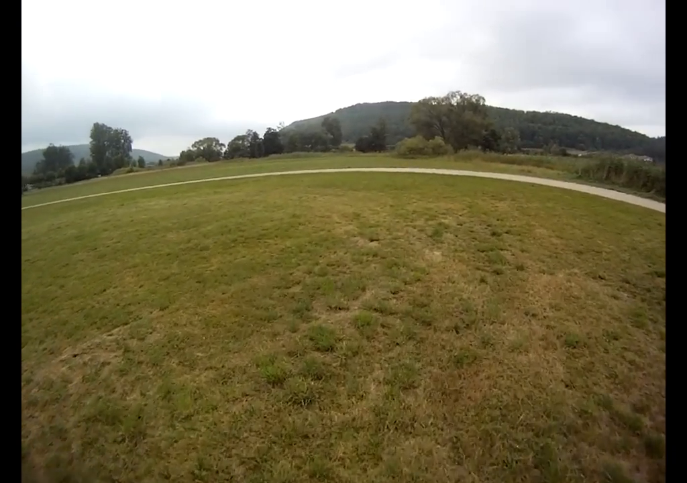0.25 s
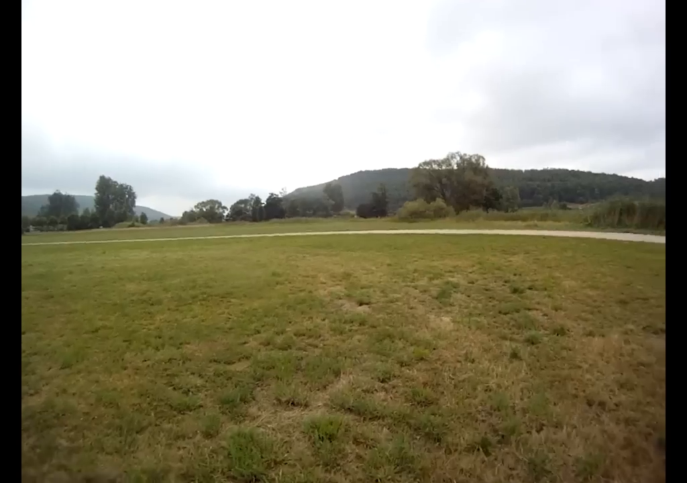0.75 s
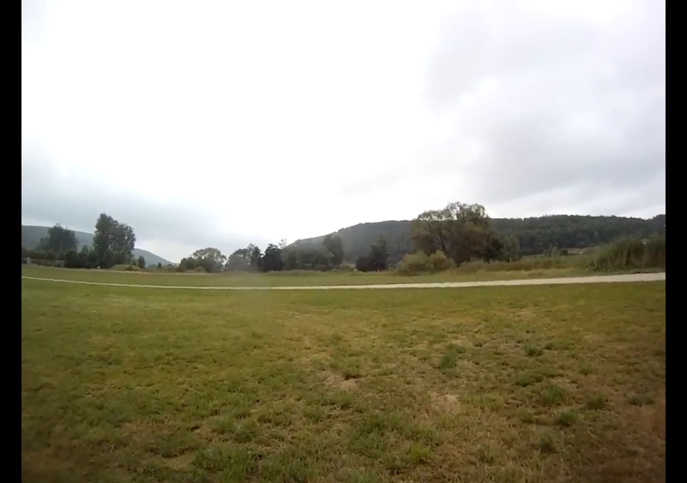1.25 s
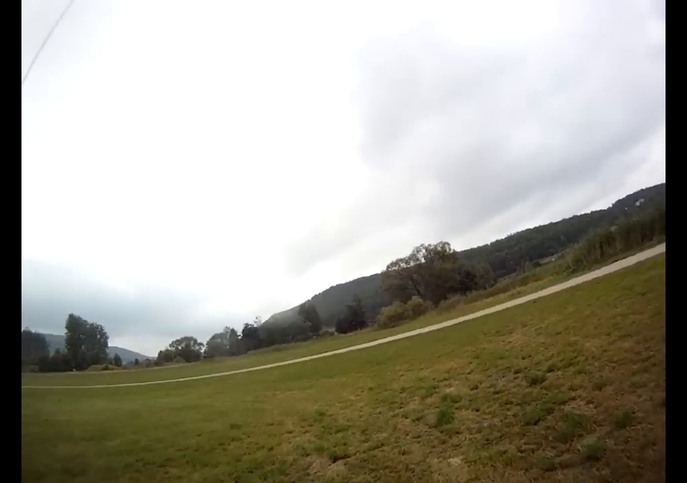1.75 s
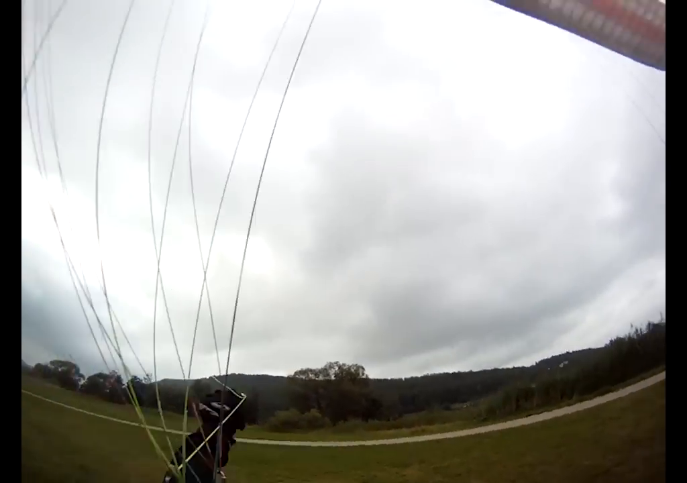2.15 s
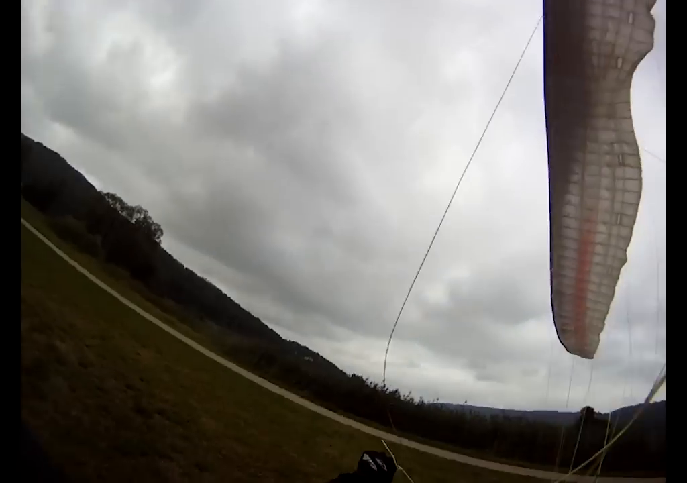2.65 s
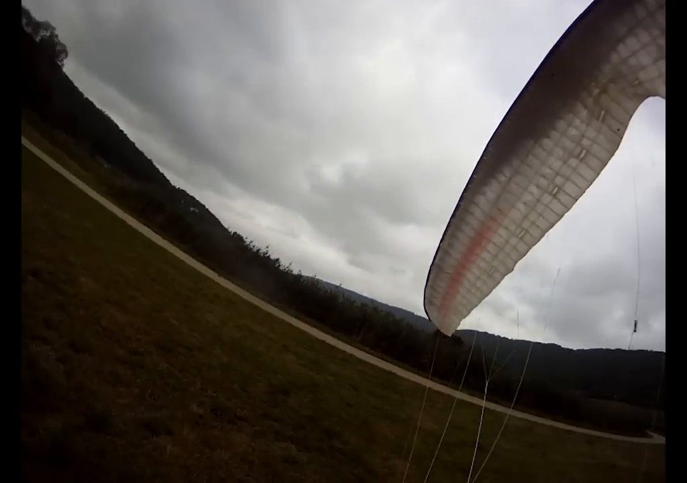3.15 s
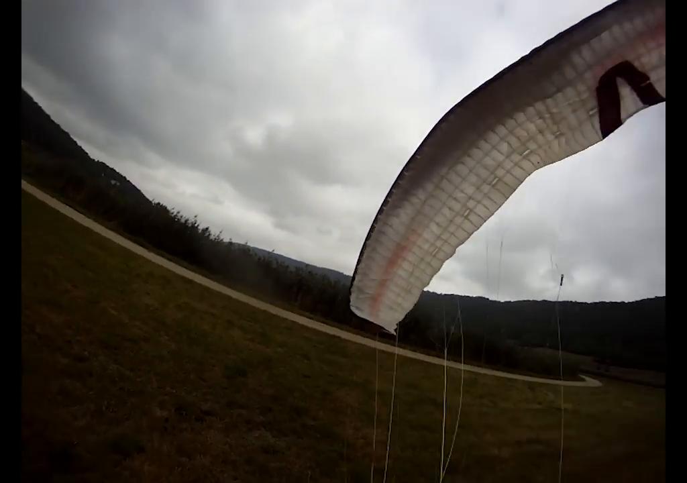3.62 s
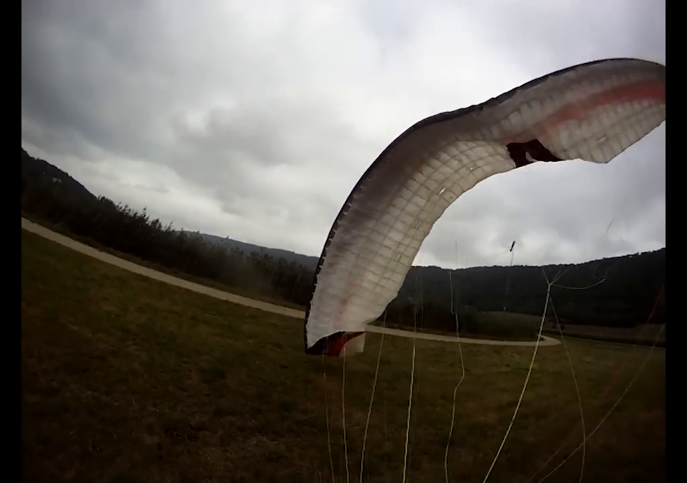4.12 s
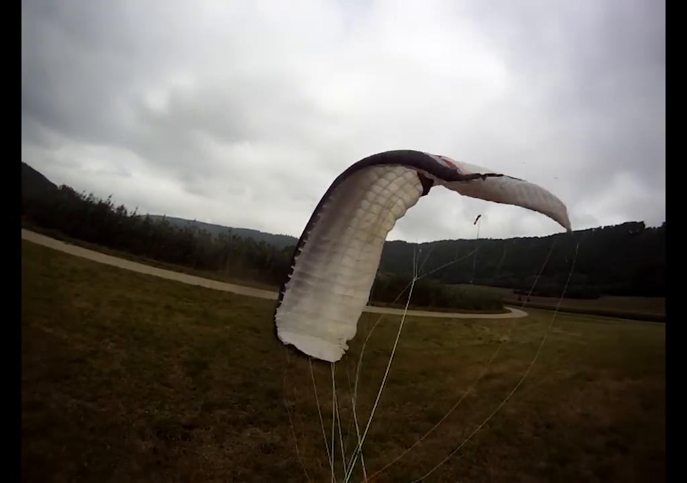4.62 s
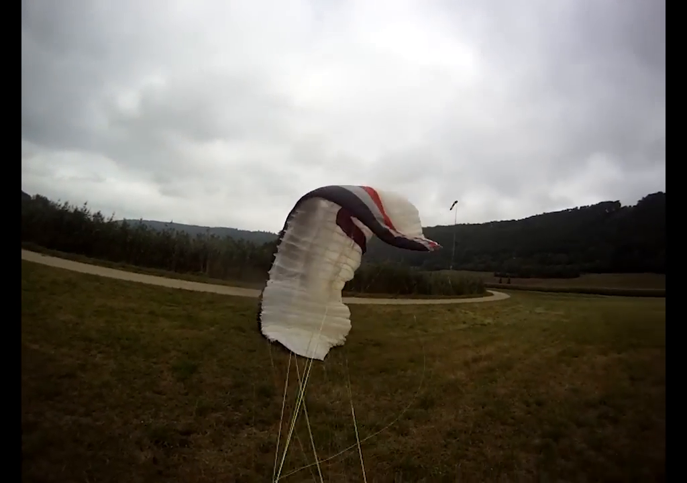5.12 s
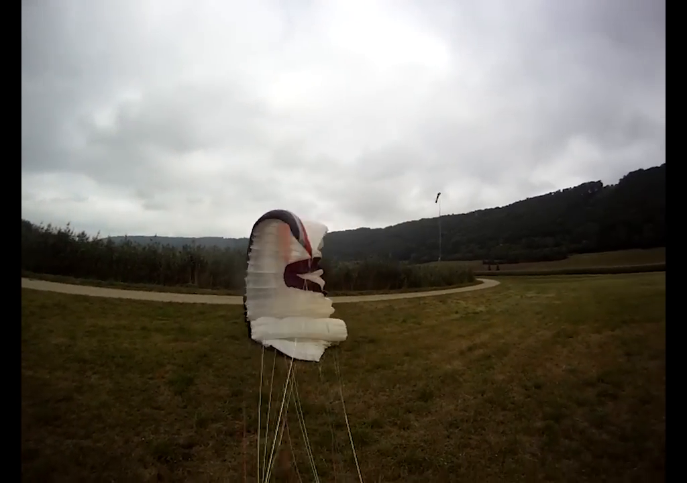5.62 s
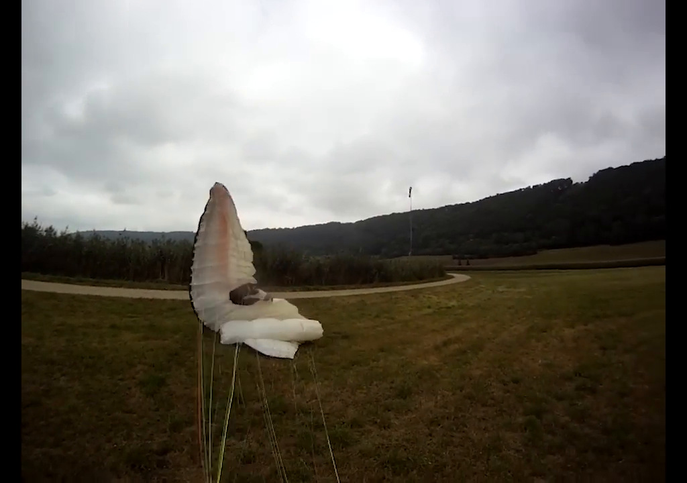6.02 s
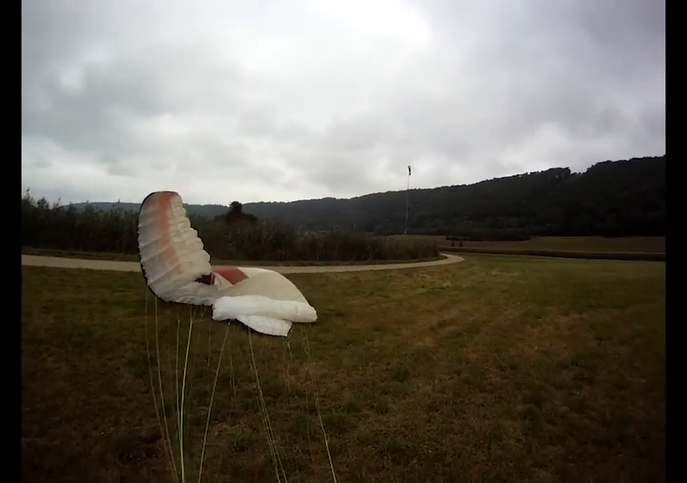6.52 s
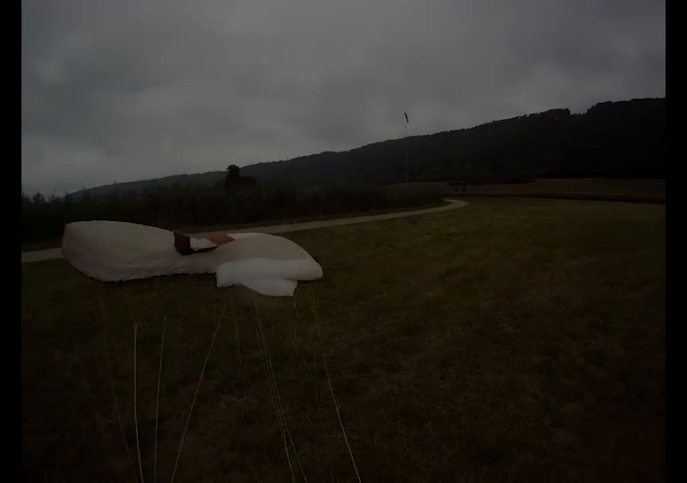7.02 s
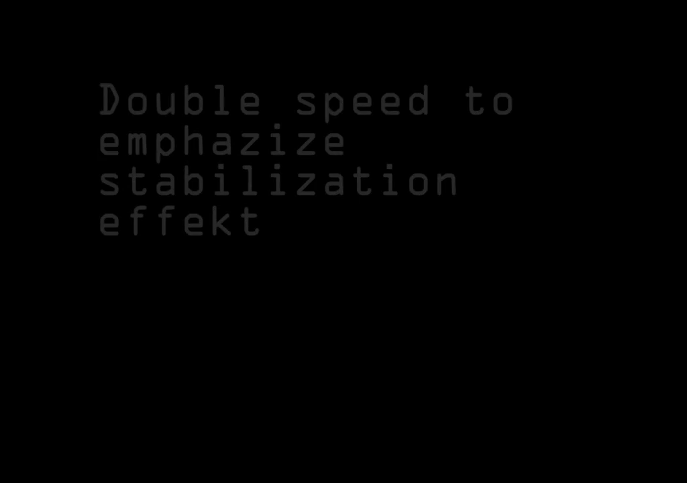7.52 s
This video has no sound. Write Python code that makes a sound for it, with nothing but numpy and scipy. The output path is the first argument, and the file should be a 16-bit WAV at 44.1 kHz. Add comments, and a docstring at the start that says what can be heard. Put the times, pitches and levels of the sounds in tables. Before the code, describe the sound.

Outdoors on open grass, heard dry and very close through a slightly gritty body-worn microphone. From 0 to 0.6 seconds low wind buffets it, with brief rough squeaks of thin lines around 0.3. At 0.6 to 0.72 a dense cluster of hard plastic knocks rattles loudly while the wind falls away; cloth puffs, strap rubs and weaker knocks follow until 1.55. Ribbed webbing then zips over an edge: the first pull, 1.55 to 2.63, climbs quickly to a bright buzzing whine near 2.2 and drops; the second, 2.75 to 4.2, is slower, lower, uneven and scratchy. From 4.2 the canopy flutters and rustles with papery crackles, with sharper snaps around 4.8 and 5.05, calming after 5.4. Faint breeze, hiss and soft cloth remain. Grainy strap scrapes come at 6.55 to 7.3, strongest near 7.1, then silence from 7.47.

```python
"""A paraglider pilot lands on a meadow, heard from a camera worn on the body.
First coloured noise buffets the microphone while thin lines squeak as gliding sines; then the wind dies away
as the gear knocks on the camera in noise cracks and ringing modes. Ribbed webbing zips over an edge in two long
pulls, a tick for each rib, while the pilot turns round. Last the canopy flutters in lumpy noise, crackles
with crease clicks and sinks onto the grass, and the straps slide once more in a grainy scrape."""
import sys
import numpy as np
from scipy import signal
from scipy.fft import rfft, irfft, next_fast_len
from scipy.io import wavfile
from scipy.ndimage import uniform_filter1d, map_coordinates

SR = 44100
rng = np.random.default_rng(int(sys.argv[2]) if len(sys.argv) > 2 else 0)


def generate_wav(signal):
    """Clip the signal to [-1, 1] and save it as 16-bit WAV at the path in sys.argv[1]."""
    frames = np.transpose(np.atleast_2d(signal))
    scaled = np.clip(frames, -1, 1) * 32767
    pcm = np.round(scaled).astype(np.int16)
    wavfile.write(sys.argv[1], SR, pcm)


N = 342416
T = np.arange(N) / SR  # time axis in seconds


def amp(db):
    """Decibels to gain."""
    return 10 ** (np.asarray(db) / 20)


def unit(x):
    """Scale to rms 1."""
    return x / np.sqrt(np.mean(x ** 2) + 1e-20)


def curve(rows):
    """Join (time_s, value) rows with straight lines, one value per sample."""
    return np.interp(T, *np.transpose(rows))


def swell(rows):
    """Gain of a (time_s, level_db) curve that fades out steeply beyond its ends."""
    outside_s = np.abs(T - np.clip(T, rows[0][0], rows[-1][0]))
    return amp(curve(rows) - 600 * outside_s)


def stroke(start_s, length_s, edge_s):
    """Gain that rises, holds for length_s and dies away, with time constant edge_s at both ends."""
    outside_s = np.abs(T - np.clip(T, start_s, start_s + length_s))
    return np.exp(-outside_s / edge_s)


def wobble(rate):
    """A smooth random curve with rate knots a second."""
    knots = rng.standard_normal(int(N * rate / SR) + 4)
    return map_coordinates(knots, [T * rate])


def coloured(x, spectrum):
    """Causal, minimum-phase filter of unit energy with the given (freq_hz, level_db) outline."""
    size = 4096
    hz, db = np.transpose(spectrum)
    level_db = np.interp(np.log(np.fft.rfftfreq(size, 1 / SR) + 1), np.log(hz + 1), db)
    cepstrum = irfft(np.log(amp(level_db) + 1e-6))
    # folding the cepstrum onto its first half makes the filter causal
    folded = 2 * cepstrum * (np.arange(size) < size // 2)
    kernel = irfft(np.exp(rfft(folded)))
    return signal.fftconvolve(x, kernel / np.linalg.norm(kernel))[:len(x)]


def noise(spectrum):
    """Coloured noise of rms 1."""
    return unit(coloured(rng.standard_normal(N), spectrum))


def pulses(at, sizes):
    """Sharp pulses at fractional sample positions, each a windowed sinc."""
    taps = np.floor(at).astype(int)[:, None] + np.arange(-7, 9)
    offset = taps - at[:, None]
    shape = np.sinc(offset) * np.cos(np.pi * offset / 16) ** 2
    return np.bincount(np.clip(taps, 0, N - 1).ravel(), (shape * sizes[:, None]).ravel(), N)


def bursts(rows, t60):
    """A dying puff of noise for each (time_s, level_db) row; it falls by 60 dB in t60 seconds."""
    t = np.arange(SR // 4) / SR
    envelope = np.zeros(N + SR)
    for time_s, level_db in rows:
        envelope[round(time_s * SR):][:len(t)] += amp(level_db - 60 * t / t60)
    return envelope[:N] * rng.standard_normal(N)


def patchy(x, depth_db):
    """Let the gain drift separately in patches about 500 Hz wide and 20 ms long."""
    z = signal.stft(x, nperseg=256)[2]
    across_pitch = uniform_filter1d(rng.standard_normal(z.shape), size=3, axis=0)
    field = uniform_filter1d(across_pitch, size=7, axis=1)
    gain = unit(amp(depth_db * unit(field)))
    return signal.istft(z * gain, nperseg=256)[1][:N]


# swells of air in harness and canopy: start_s, length_s, flutter_db, push_db (push on the microphone)
BILLOWS = [(0.122, .04, -57, -32), (0.787, 0.019, -26.5, -28), (1.31, 0.013, -39, -50),
           (1.432, 0.059, -38.5, -50), (1.54, .02, -38.5, -54), (2.406, 0.294, -50.5, -46.5),
           (4.888, 0.013, -35.5, -35.5), (5.07, 0.027, -46, -36.5), (6.03, 0.082, -52, -42.5),
           (7.12, .2, -48, -59)]


def billow_gains():
    """Each swell of air both flutters the cloth and pushes on the microphone; returns the two gains."""
    flutter, push = np.zeros(N), np.zeros(N)
    for start_s, length_s, flutter_db, push_db in BILLOWS:
        shape = stroke(start_s, length_s, edge_s=.018)
        flutter += amp(flutter_db) * shape
        push += amp(push_db) * shape
    return flutter, push


# bright, papery colour of creasing cloth: freq_hz, level_db (relative)
CREASE_COLOUR = [(350, -15.5), (600, 1), (807, -6.5), (971, -6), (1800, -8), (2160, -4.5), (3020, -3),
                 (3630, -13.5), (4890, -11), (5600, -22), (7000, -54)]


def creased(x):
    """Give a signal the bright, papery colour of creasing cloth."""
    return coloured(x, CREASE_COLOUR)


TOUCHDOWN_S, SLOWING_DB_PER_S = 0.58, 26  # the airflow fades once the feet are down
FLIGHT_DB, DRAUGHT_DB, HISS_DB = -29.5, -45, -52.5  # buffeting in flight; breeze on the ground; faint hiss
# colour of the buffeting in flight: freq_hz, level_db (relative)
BUFFET_COLOUR = [(10, -12), (20, 3.5), (37, 4.5), (55, 7), (75, 4.5), (110, -4.5), (170, -10), (300, -22),
                 (600, -60)]
# colour of the low breeze and of the pushes from the cloth: freq_hz, level_db (relative)
DRAUGHT_COLOUR = [(10, -23.5), (20, 4.5), (42, -2.5), (62, 1.5), (92, 1.5), (125, -5), (200, -16),
                  (450, -49.5)]


def wind():
    """Flight speed buffets the microphone; a low draught, pushes from the cloth and a faint hiss remain."""
    airflow = amp(FLIGHT_DB - SLOWING_DB_PER_S * np.maximum(T - TOUCHDOWN_S, 0))
    eddies = unit(noise(BUFFET_COLOUR) * amp(1.2 * wobble(18)))
    _, pushes = billow_gains()
    draught = np.hypot(amp(DRAUGHT_DB + 2.2 * wobble(6)), pushes)
    hiss = unit(creased(rng.standard_normal(N)))
    return airflow * eddies + draught * noise(DRAUGHT_COLOUR) + amp(HISS_DB) * hiss


# dull colour of webbing dragged without a tone: freq_hz, level_db (relative)
SCRAPE_COLOUR = [(400, -23), (700, -8), (1150, -6), (1700, -11), (1930, -4.5), (2130, 2), (2400, -6),
                 (3100, -4), (3900, -15), (5200, -20.5), (7000, -58.5)]


def dull_scrape():
    """Steady friction noise of sliding straps."""
    return noise(SCRAPE_COLOUR)


# straps and clothes rubbing: start_s, length_s, level_db
RUBS = [(0.354, 1.36, -50), (0.714, .035, -38), (.76, 0.124, -46.5), (0.988, 0.0098, -49),
        (1.039, 0.048, -42), (1.238, 0.1, -46), (5.918, 0.047, -48.5), (6.557, 0.046, -37),
        (6.689, 0.066, -41.5), (6.771, 0.295, -40), (7.085, 0.061, -33.5), (7.156, 0.029, -40.5),
        (7.216, 0.076, -40.5), (7.31, 0.3, -54)]
# thin lines squeaking in their guides: time_s, pitch_hz (about which it wavers), level_db (relative)
SQUEAKS = [(0.255, 2770, -49.5), (0.288, 2850, -43.5), (0.326, 2630, -52), (0.356, 2820, -60),
           (0.424, 2150, -56)]


def harness():
    """Straps rub against the clothes in a fine, grainy scrape; taut lines give brief, rough squeaks."""
    scrape = unit(dull_scrape() * amp(1.8 * wobble(60) + 1.2 * wobble(400)))
    rub_power = sum((amp(level_db) * stroke(start_s, length_s, edge_s=.007)) ** 2
                    for start_s, length_s, level_db in RUBS)
    squeaks = np.zeros(N)
    for time_s, pitch_hz, level_db in SQUEAKS:
        slip = np.exp(-.5 * ((T - time_s) / 0.0075) ** 2)
        # the pitch arches with the slip and jitters fast, which makes the squeak rough
        glide_hz = pitch_hz * (.9 + .1 * slip + .09 * wobble(1800))
        tone = np.sin(2 * np.pi * np.cumsum(glide_hz) / SR)
        squeaks += amp(level_db) * slip * (tone + amp(-19) * scrape)
    return np.sqrt(rub_power) * scrape + amp(4.0) * squeaks


SUIT_DB, SUIT_REST_DB, STANDING_S = -44, -50.5, 1.49  # clothes flutter until the pilot stands
# body of the billowing cloth: freq_hz, level_db (relative)
BILLOW_COLOUR = [(60, -29), (120, -1.5), (190, -1), (320, -1), (540, -2.5), (760, -15.5), (1100, -32.5),
                 (1600, -38), (3000, -68.5)]
# cloth snapping taut: time_s, level_db (relative)
SNAPS = [(0.8816, -22), (0.9935, -25), (4.4169, -36), (4.7396, -35), (4.7661, -32), (4.816, -16.5),
         (4.841, -38), (4.9928, -37), (5.0426, -20.5), (6.556, -31)]
# how hard the sinking canopy stirs: time_s, level_db (relative)
CANOPY_STIR = [(4.22, -47), (4.4, -41.5), (4.6, -37), (4.95, -37), (5.12, -38), (5.45, -47.5),
               (5.75, -45.5), (6.1, -48.5), (6.5, -59)]


def cloth():
    """Cloth billows in quick lumps of noise; the same lumps swell a shower of tiny crease clicks."""
    lumps = wobble(38)
    billow = unit(noise(BILLOW_COLOUR) * amp(1.6 * lumps))

    count = 9000
    click_db = 3.8 * np.minimum(rng.exponential(size=count), 4)
    clicks = pulses(rng.uniform(0, N, count), rng.choice([-1, 1], count) * amp(click_db))
    creases = unit(creased(rng.standard_normal(N))) + amp(-4) * unit(creased(clicks))
    rustle = unit(patchy(creases, depth_db=1.5) * amp(.8 * lumps))
    snaps = creased(bursts(SNAPS, t60=0.0079))

    # one motion of the canopy drives both its flutter and its rustle
    canopy = swell(CANOPY_STIR) * amp(0.33 * wobble(16))
    suit = amp(curve([(STANDING_S, SUIT_DB), (STANDING_S + 0.6, SUIT_REST_DB)]))
    swells, _ = billow_gains()
    flutter = np.sqrt(suit ** 2 + swells ** 2 + (amp(-4.5) * canopy) ** 2)
    return flutter * billow + amp(-3.5) * canopy * rustle + amp(-7) * snaps


# gear striking the camera housing: time_s, level_db (relative)
KNOCKS = [(0.598, -12.5), (0.6129, -0.5), (0.6154, 1), (0.6415, 2.3), (0.6425, -1.5), (0.645, 3.5),
          (0.648, -14), (0.6494, -1.5), (0.677, -13.5), (0.6835, -7.5), (0.6951, -9), (0.6968, 7.5),
          (0.724, -10), (0.995, -35), (1.277, -20.5), (1.303, -24), (1.31, -17), (1.545, -25.5)]
# resonances of the housing: freq_hz, level_db (relative), t60_s; pitch and level vary a little per knock
HOUSING_MODES = [(363, -13.5, .055), (537, -11.5, 0.044), (560, -10.5, 0.068), (622, 1, 0.038),
                 (982, 0, .018), (1200, -17.5, 0.0054), (2130, -25.5, .017), (2550, -14.5, 0.034),
                 (3137, -6.5, 0.016)]
# colour of the hard contact itself: freq_hz, level_db (relative)
CRACK_COLOUR = [(150, -45), (250, -21), (522, -13.5), (857, -3), (959, 1), (1680, -8), (2100, -4),
                (5230, -24), (7000, -45.5)]


def knocks():
    """Hard contacts crack on the housing and ring its short plastic resonances."""
    t = np.arange(SR // 8) / SR
    ring = np.zeros(N + SR)
    for time_s, knock_db in KNOCKS:
        modes = np.zeros(len(t))
        for freq_hz, level_db, t60_s in HOUSING_MODES:
            decay = amp(level_db + rng.normal(0, 1.5) - 60 * t / t60_s)
            mode_hz = freq_hz * (1 + rng.normal(0, .02))
            modes += decay * np.sin(2 * np.pi * mode_hz * t)
        ring[round(time_s * SR):][:len(t)] += amp(knock_db) * modes
    cracks = coloured(bursts(KNOCKS, t60=0.0099), CRACK_COLOUR)
    return amp(-16.0) * ring[:N] + amp(-7.5) * cracks


STRAP_DB, STRAP_GROWS = -21.5, 1.494  # level at full speed; power of the speed that it follows
FULL_SPEED, STALL_SPEED = 1026, 159  # ribs per second; under the stall speed the strap hardly sounds
JUDDER = .045  # depth of the speed judder of a slow pull, as a share of the speed
TUG_S = .022  # half width of a tug
# two long pulls on the webbing: time_s, steady_speed (ribs per second), pressure_db (on the edge)
PULLS = [
    [(1.55, 115, -2), (1.595, 297, -1), (1.744, 433, 0.5), (1.893, 855, 0), (1.945, 747, 0.5),
     (2.191, 997, -4.5), (2.265, 610, -1), (2.43, 380, 0), (2.469, 148, -1.5), (2.565, 295, 0.5),
     (2.631, 96, -4)],
    [(2.747, 99, -3), (2.89, 388, 0), (3.098, 254, -1.5), (3.285, 530, -1), (3.539, 373, 1.5),
     (3.656, 226, 1.5), (3.852, 154, -0.5), (4.01, 235, 2.5), (4.21, 205, -2)],
]
# short tugs on top of the pull: time_s, extra_speed (ribs per second)
TUGS = [(1.694, 190), (1.779, 348), (1.963, 221), (2.074, 341), (2.284, 115), (2.384, 172), (2.522, 181),
        (2.989, 131), (3.073, 299), (3.129, 352), (3.214, 152), (3.533, 106), (3.713, 262), (3.848, 148),
        (4.195, 55)]


def pull():
    """Steady pull, tugs and slow judder set the rib speed; loudness follows speed and edge pressure."""
    rows = np.vstack(PULLS)
    pressure_rows = rows[:, ::2]
    speed = curve(rows[:, :2])
    for time_s, extra_speed in TUGS:
        speed = speed + extra_speed * np.exp(-.5 * ((T - time_s) / TUG_S) ** 2)
    slow = np.interp(speed, [480, 700], [1, .15])
    speed = speed * (1 + JUDDER * slow * wobble(45) + .009 * wobble(170))
    speed = np.maximum(speed, 20)
    gain = amp(STRAP_DB) * (speed / FULL_SPEED) ** STRAP_GROWS / (1 + (STALL_SPEED / speed) ** 4)
    return speed, gain * swell(pressure_rows), curve(pressure_rows)


def dispersed(x):
    """The strap passes some frequencies on later than others, smearing each tick over milliseconds."""
    size = 2048
    spread_s = .0012
    ripple = unit(uniform_filter1d(rng.standard_normal(size // 2 + 1), size=24))
    delay_s = np.abs(spread_s * (2 + ripple))
    kernel = irfft(np.exp(-2j * np.pi * np.cumsum(delay_s) * SR / size))
    return signal.fftconvolve(x, kernel[:size // 2])[:N]


def rib_ticks(speed, ribs):
    """One tick as each rib passes the edge, a little uneven in time and height."""
    passing = np.arange(1, int(ribs[-1]))
    # slow ribs catch at less even moments, and every second rib stands a little higher
    scatter = np.interp(np.interp(passing, ribs, speed), [300, 550, 800], [.02, .012, .008])
    at = np.interp(passing + scatter * rng.standard_normal(len(passing)), ribs, np.arange(N))
    sizes = amp(2.3 * rng.standard_normal(len(at)) + 1.2 * (passing % 2 - .5))
    # dividing by the root of the rate keeps the power even at any speed
    return dispersed(pulses(at, sizes) / np.sqrt(speed / SR))


EDGE_HZ, EDGE_Q, EDGE_DB = 1104, 11.3, 0  # the edge rings within a band of fairly slow rib speeds
# colour of slow ribs and loose fibres: freq_hz, level_db (relative)
WEBBING_COLOUR = [(300, -19), (560, -0.5), (780, -10.5), (1130, -2.5), (1600, -6), (2150, 0), (2600, 1.5),
                  (3300, -5), (4300, -5.5), (4650, -12), (5100, -5.5), (5700, -25.5), (7000, -59)]
# brighter whine of fast ribs: freq_hz, level_db (relative)
WHINE_COLOUR = [(300, -36), (700, -21.5), (1000, -5.5), (1300, -13.5), (1700, -4), (2600, 3.5),
                (3400, -6.5), (5000, -13), (5700, -20.5), (7000, -60)]


def strap_tone(speed, pressure_db):
    """Rib ticks fuse into a zipping tone, roughened by hissing fibres and coloured by the ringing edge."""
    ribs = np.cumsum(speed) / SR
    ticks = rib_ticks(speed, ribs)
    # fast ribs strike harder and shift the weight of the tone upward
    fast = np.interp(speed, [600, 800], [0, 1])
    zipping = (1 - fast) * coloured(ticks, WEBBING_COLOUR) + fast * coloured(ticks, WHINE_COLOUR)

    # loose fibres hiss, most while a rib is on the edge
    rib_pulse = amp(6.2 * np.cos(2 * np.pi * ribs))
    fibres = unit(coloured(rng.standard_normal(N) * rib_pulse, WEBBING_COLOUR))
    rough = np.interp(speed, [200, 330, 480, 600, 800], [.7, .35, .27, .15, .06])
    # where the pressure eases the ribs skip and the tone breaks up
    rough = np.clip(rough - .045 * np.minimum(pressure_db + 1, 0), 0, 1)

    # the twisting strap favours now one overtone, now another
    strap = patchy(np.sqrt(1 - rough) * zipping + np.sqrt(rough) * fibres, depth_db=2.3)
    ringing = np.interp(speed, [270, 340, 430, 500], [0, 1, 1, 0])
    edge = signal.lfilter(*signal.iirpeak(EDGE_HZ, EDGE_Q, SR), zipping)
    strap = strap * (1 - 0.2 * ringing) + amp(EDGE_DB) * ringing * edge
    # a copy thrown back by the nearby gear gives fixed bands that the overtones glide through
    return strap + .28 * np.interp(T - .00093, T, strap)


def webbing():
    """Each rib of the weave ticks over the edge: a fast pull sings like a zip, a slow one only scrapes."""
    speed, loudness, pressure_db = pull()
    strap = strap_tone(speed, pressure_db)
    # at a crawl the ribs catch less and a dull scrape takes over
    crawl = np.interp(speed, [170, 320], [.8, 0])
    sliding = np.sqrt(1 - crawl) * strap + np.sqrt(crawl) * dull_scrape()
    # the uneven weave makes the pull rasp
    rasp = amp(.7 * wobble(70) + 1.3 * wobble(230))
    return loudness * rasp * sliding


def scene():
    """Sum all sources, close and without any echo from the open field, as one channel."""
    return (wind() + harness() + cloth() + knocks() + webbing())[None]


INPUT_HZ, HOLD_HZ, TOP_HZ = 5913, 12000, 11550  # converter input limit, hold rate, top of the output
STOP_S = 7.469  # the sound breaks off abruptly here, within a few milliseconds
# the housing colours all that it lets in: centre_hz, width_hz, gain_db
HOUSING_COLOUR = [(1014, 94, 1.5), (1600, 510, 0.5), (2042, 37, 3.5), (3530, 450, 0.5)]


def record(dry):
    """The housing colours the sound; a slow converter's held samples mirror it into the treble; peaks clip."""
    size = next_fast_len(N + SR // 2)
    hz = np.fft.rfftfreq(size, 1 / SR)
    colour_db = sum(gain_db * np.exp(-.5 * ((hz - centre_hz) / width_hz) ** 2)
                    for centre_hz, width_hz, gain_db in HOUSING_COLOUR)
    input_gain = amp(colour_db) / np.sqrt(1 + (hz / INPUT_HZ) ** 60)
    taken = irfft(rfft(dry, size) * input_gain, size)[:, :N]
    # multiplying by the hold rate mirrors the spectrum; the droop weakens the image towards that rate
    droop = np.clip((HOLD_HZ - hz) / (hz + 1), 0, 1)
    image = 2 * np.cos(2 * np.pi * HOLD_HZ * T) * taken
    mirrored = irfft(rfft(image, size) * droop, size)[:, :N]
    overloaded = np.clip(taken + mirrored, -1, 1)
    faded = overloaded * np.clip((STOP_S - T) / .004, 0, 1)
    return irfft(rfft(faded, size) / np.sqrt(1 + (hz / TOP_HZ) ** 120), size)[:, :N]


dry = scene()
out = record(dry)
generate_wav(out)
```